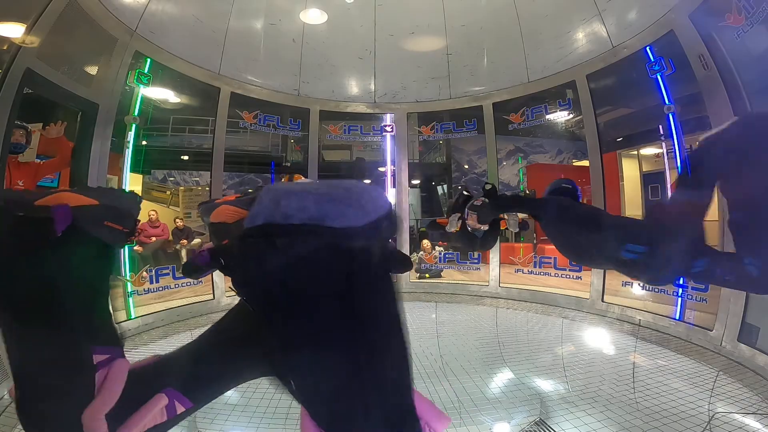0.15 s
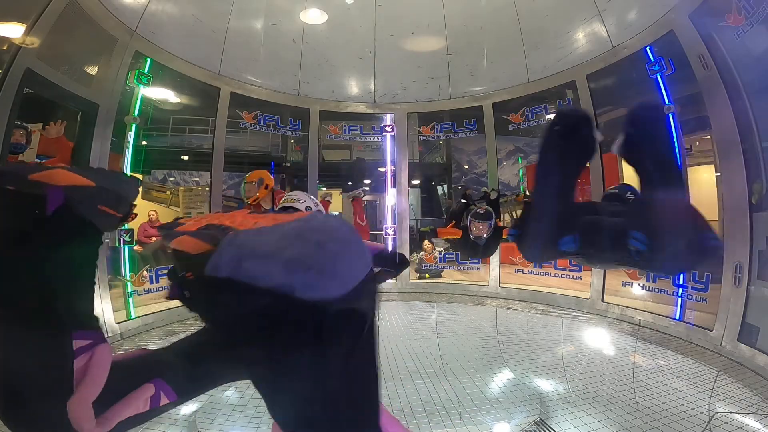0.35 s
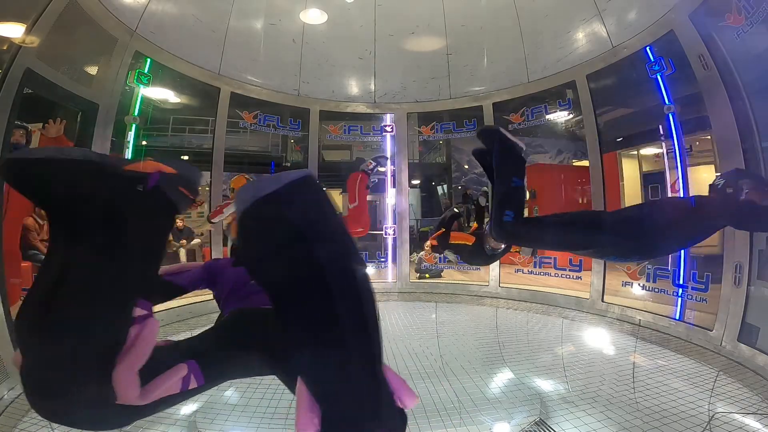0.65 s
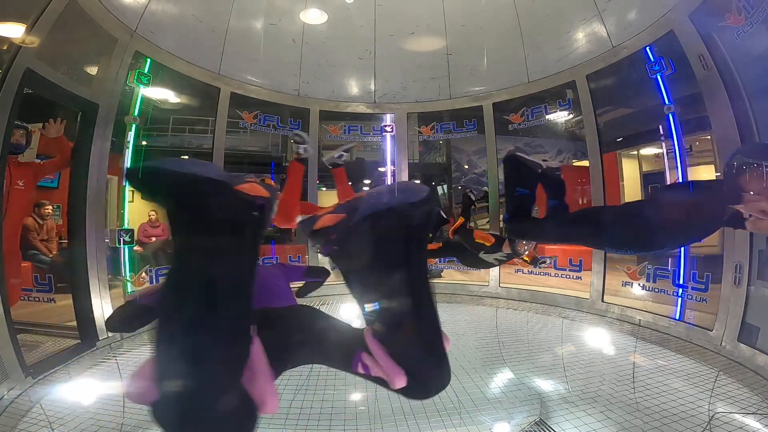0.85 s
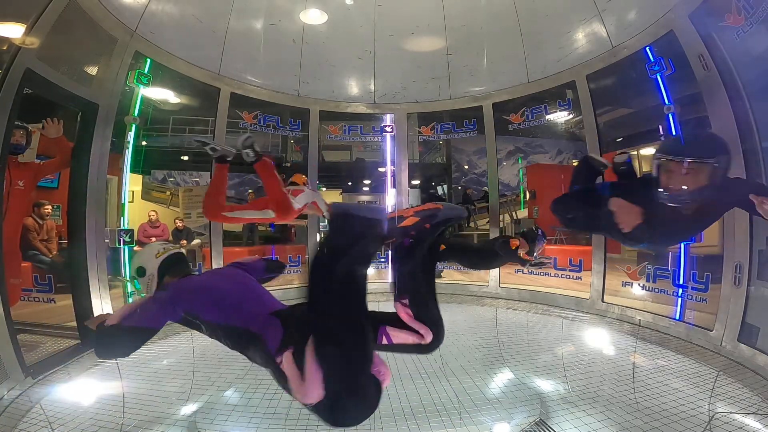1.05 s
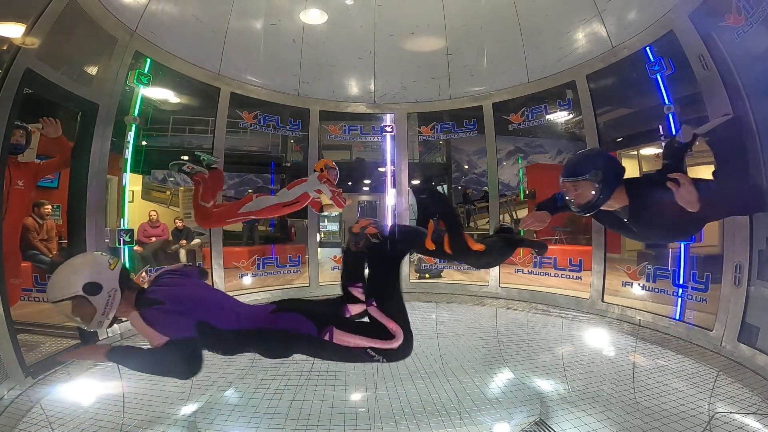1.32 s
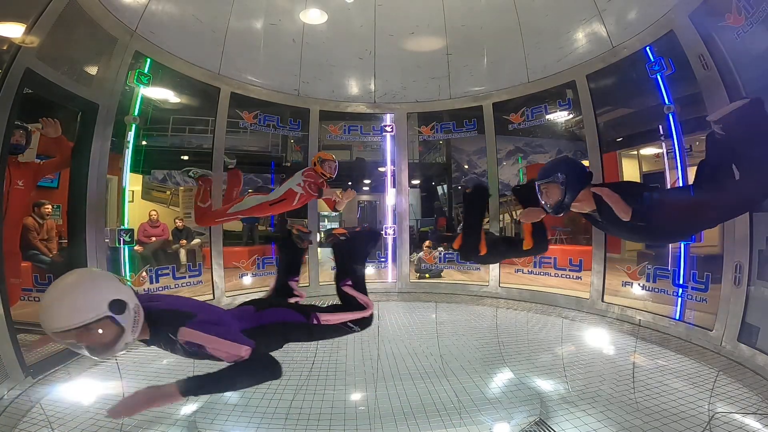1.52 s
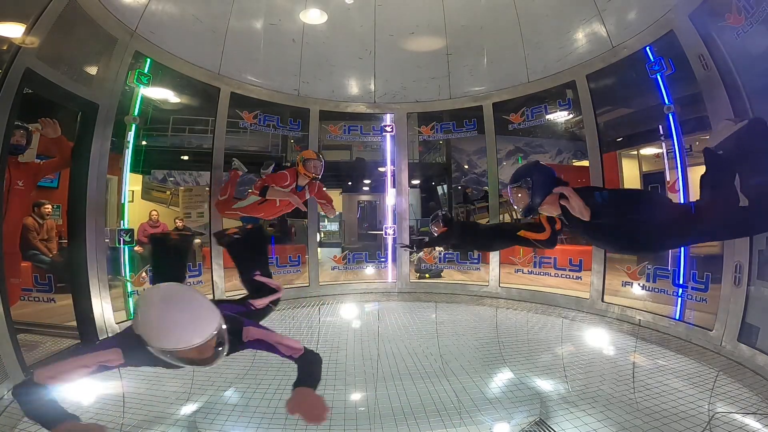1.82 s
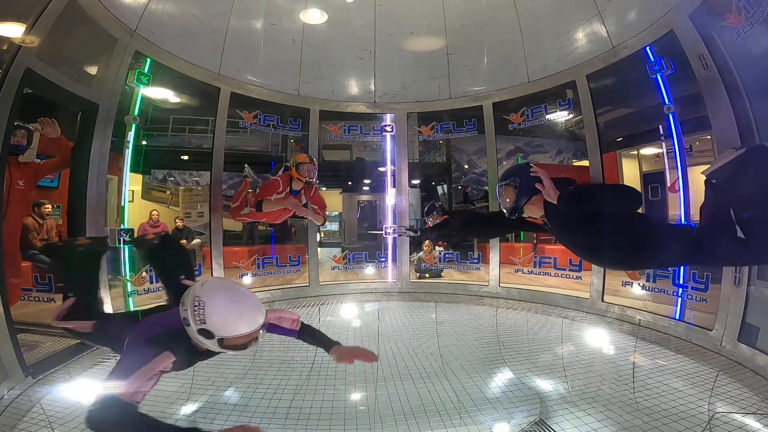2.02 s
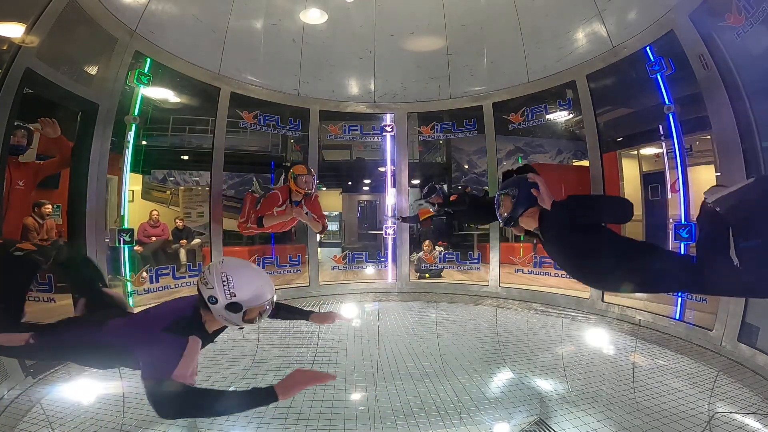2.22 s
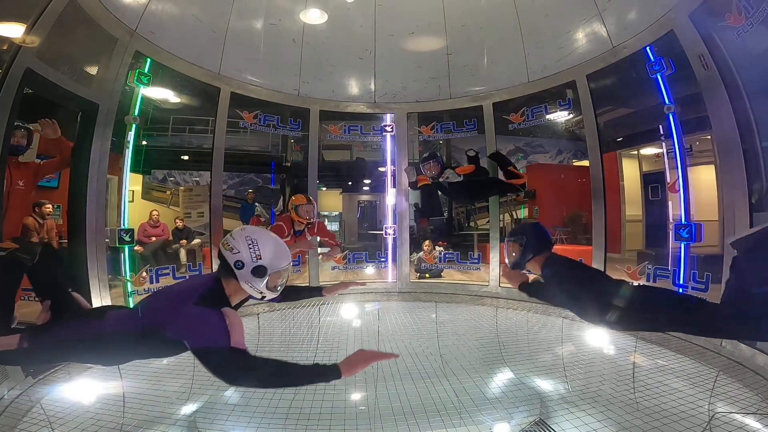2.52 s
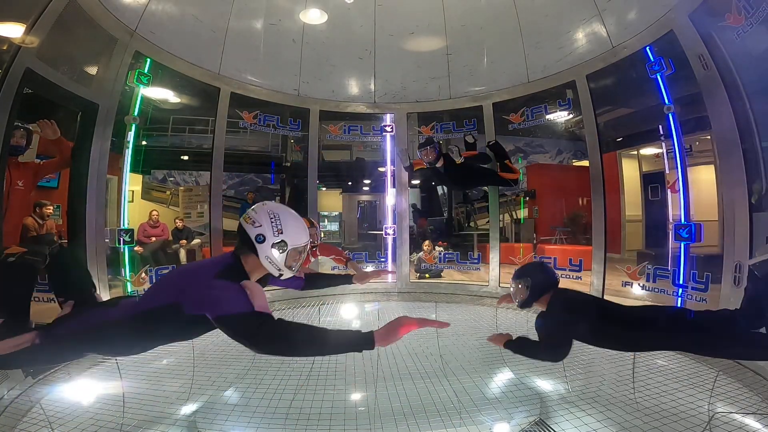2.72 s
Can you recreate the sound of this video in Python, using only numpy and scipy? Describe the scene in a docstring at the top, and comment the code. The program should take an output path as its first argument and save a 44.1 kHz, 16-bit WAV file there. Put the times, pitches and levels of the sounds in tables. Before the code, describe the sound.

A loud roar of rushing air fills a vertical wind tunnel for about three seconds, heard from the chamber wall. A deep throbbing drone and a high wavering whistle run through it. A second low note swells near 1.5 and 2.3 seconds. From 1.6 seconds a few brief low buffets of air hit the wall. After 2.4 seconds the rumble grows, with the strongest buffet near 2.8 seconds.

```python
"""Glass flight chamber of a vertical wind tunnel, heard from the wall.
From the start the air column throbs on one deep note, the duct's modes drone, and the flow roars
and sings near 3.5 kHz, probably on the cables of the floor net. A second low note swells near 1.5 s
and 2.3 s. From 1.6 s single eddies buffet the wall. After 2.4 s the turbulence grows as flyers drift
close; the throb dips briefly just before the end."""
import sys
import numpy as np
from scipy import signal
from scipy.fft import rfft, irfft, next_fast_len
from scipy.io import wavfile
from scipy.ndimage import uniform_filter1d, minimum_filter1d, map_coordinates

SR = 44100
rng = np.random.default_rng(int(sys.argv[2]) if len(sys.argv) > 2 else 0)


def wav_out(sig):
    """Save sig, one row per channel (or a flat mono array), as 16-bit PCM at SR to the path in sys.argv[1]."""
    wavfile.write(sys.argv[1], SR, np.round(np.clip(np.atleast_2d(sig).T, -1, 1) * 32767).astype(np.int16))


N = 126126

# two microphone ports
PORT_COHERENCE = [(100, 1), (400, .97), (1050, 0.95), (1330, 0.69), (1550, 0.68), (2200, 0.57), (2650, .72),
                  (3400, .33), (4000, 0.42), (5000, 0.26), (8000, .1)]  # (frequency [Hz], coherence [0..1])
PORT_BALANCE_DB = [(100, 1.4), (220, 0), (400, 3), (800, 4.2), (1050, 2.5), (1300, 3.5), (1600, 1.5),
                   (2000, 0), (2500, 5.5), (2900, 2), (3500, 1), (4200, -1.5), (5400, -7), (6500, -5),
                   (7800, -4.5), (10000, 0.5)]  # (frequency [Hz], left minus right [dB])
PORT_LEAD_RAD = [(100, 0), (2000, 0), (2300, -0.5), (3200, -.5), (3750, .2), (4300, 0.5), (5000, 2),
                 (6500, 2.5), (10000, 3.5)]  # (frequency [Hz], left phase lead [rad])
# duct resonances (centre [Hz], width [Hz], level [dB])
DUCT_MODES = [(86.8, 6, -28.5), (112.5, 5.1, -35.5), (126.5, 5, -33.5), (147.4, 8.7, -30.5),
              (161, 9.7, -29.5), (171.3, 10, -36), (191, 9.7, -34), (226.7, 11.2, -32.5),
              (253, 15.6, -32.3), (322, 16, -39.5), (457.2, 6.6, -44)]
# eddies hitting the wall (time [s], length [s], pitch [Hz], peak level [dB])
BUFFETS = [(1.622, .018, 150, -25), (2.322, .028, 140, -21), (2.65, 0.024, 158, -21),
           (2.737, .035, 242.3, -24.5), (2.778, 0.039, 152, -14.5)]
# vortex tones (centre [Hz], width [Hz], relative level [dB], left minus right [dB])
SINGING_BANDS = [(931, 42, -40.5, 7), (1118, 46, -35.5, 4), (3190, 276, -29.5, 8.5), (3450, 270, -26, 3.5),
                 (3668, 240, -27.5, 1.5)]
WHISTLE_BAND = (3550.5, 49.5, -33, 3.5)
# turbulence spectra (frequency [Hz], relative density [dB])
RUMBLE_SPECTRUM = [(5, -27.5), (20, 6), (30, 1.5), (50, -1.5), (100, -12), (140, -0.5), (175, -3.5),
                   (210, -9.5), (255, -5.5), (300, -13), (600, -49), (1500, -100)]
ROAR_SPECTRUM = [(100, -33), (220, -1.5), (310, 3.5), (500, 2.5), (800, 0), (1050, 2), (1400, -2.5),
                 (1900, -1.5), (2300, -2.5), (2950, -1.5), (3700, -2.5), (4200, -22.5), (6000, -62.5)]
HISS_SPECTRUM = [(2000, -46), (3400, -3), (3950, -1), (4400, -5.5), (5000, -9), (6000, -15), (7400, -17),
                 (8500, -26.5), (10000, -34), (13000, -43), (15000, -52.5)]
# flow envelopes (time [s], relative level [dB])
RUMBLE_DB = [(0, -21.5), (1.5, -23), (1.8, -24.5), (2.0, -22), (2.4, -21.5), (2.62, -17.5), (2.86, -17.5)]
ROAR_DB = [(0, -23), (1.0, -23), (2.2, -22.5), (2.42, -21.5), (2.54, -20), (2.6, -19.6), (2.68, -23),
           (2.86, -21.4)]
TREBLE_DB = [(0, 0.5), (.6, 0.5), (1.2, 0.55), (1.9, 0), (2.4, -0.6), (2.86, -.5)]  # singing and hiss
# air column envelopes
THROB_DB = [(0.02, -25.5), (0.07, -15), (0.46, -16.5), (0.52, -14), (0.7, -16), (2.23, -15.8), (2.62, -22),
            (2.77, -35), (2.83, -18.5)]  # (time [s], level [dB])
BOOM_DB = [(0, -30.5), (1.38, -34.5), (1.47, -23.5), (1.6, -23), (1.8, -23.5), (2.12, -39), (2.25, -24),
           (2.44, -21), (2.6, -32), (2.86, -28.5)]  # (time [s], relative level [dB])


def amp(db):
    """Decibels to gain."""
    return 10 ** (np.asarray(db) / 20)


def along(points, hz):
    """(Hz, value) points read on a log axis."""
    knots_hz, values = np.transpose(points)
    return np.interp(np.log(hz + 1), np.log(knots_hz + 1), values)


def curve(rows):
    """(s, value) rows read at every sample."""
    return np.interp(np.arange(N) / SR, *np.transpose(rows))


def wobble(rate_hz):
    """Smooth random curve, rate_hz knots a second."""
    return map_coordinates(rng.standard_normal(512), [np.arange(N) * rate_hz / SR], mode="mirror")


def band(centre_hz, width_hz):
    """Resonance with steep skirts."""
    return lambda hz: 1 / (1 + ((hz - centre_hz) / width_hz) ** 2) ** 2


def note(hz, drift_hz):
    """Sine of rms 1 with drifting pitch."""
    phase = 2 * np.pi * np.cumsum(hz + drift_hz * wobble(4.81)) / SR
    return np.sqrt(2) * np.sin(phase + rng.uniform(0, 2 * np.pi))


def airflow(colour, balance_db=PORT_BALANCE_DB):
    """Coloured noise at the two ports; their mean has rms 1."""
    hz = np.fft.rfftfreq(N, 1 / SR)
    common, opposed = rfft(rng.standard_normal((2, N))) * colour(hz)
    sign = np.array([[1], [-1]])
    mix_rad = np.arccos(np.clip(along(PORT_COHERENCE, hz), 0, 1)) / 2
    mixed = np.cos(mix_rad) * common + sign * np.sin(mix_rad) * opposed
    gain = amp(sign * along(balance_db, hz) / 2)
    lead = np.exp(1j * sign * along(PORT_LEAD_RAD, hz) / 2)
    pair = irfft(mixed * gain * lead, N)
    return pair / np.sqrt(np.mean(pair.mean(0) ** 2) + 1e-20)


def steadied(x, share):
    """x with a share of its swelling and fading evened out."""
    envelope = np.abs(signal.hilbert(x.mean(0)))
    even = x / (envelope + envelope.mean() / 10) ** share
    return even / even.mean(0).std()


def wavering(x, depth, rate_hz):
    """x with its pitch drifting by the fraction depth."""
    position = np.arange(N) + np.cumsum(depth * wobble(rate_hz))
    return np.array([map_coordinates(port, [position], mode="mirror") for port in x])


def duct():
    """The flow keeps the duct's modes droning at a fairly even strength."""
    return sum(amp(db) * steadied(airflow(band(hz, width_hz)), share=0.31)
               for hz, width_hz, db in DUCT_MODES)


def buffets(drift_hz=3.01):
    """Each eddy at the wall swells and fades on a wavering low note."""
    t = np.arange(N) / SR
    return sum(amp(db) * np.exp(-2 * ((t - peak_s) / length_s) ** 2) * note(hz, drift_hz)
               for peak_s, length_s, hz, db in BUFFETS)


def singing(waver_db=0.5):
    """Shed vortices sing in broad bands; a narrow whistle wanders inside the strongest."""
    bands = sum(amp(db + waver_db * wobble(12)) * airflow(band(hz, width_hz), [(hz, pan_db)])
                for hz, width_hz, db, pan_db in SINGING_BANDS)
    hz, width_hz, db, pan_db = WHISTLE_BAND
    narrow = airflow(band(hz, width_hz), [(hz, pan_db)])
    whistle = amp(db) * wavering(narrow, depth=0.017, rate_hz=11)
    return amp(curve(TREBLE_DB)) * (bands + whistle)


def eddies(spectrum, envelope_db, gain_db, flutter_db, flutter_hz):
    """Flow noise from one size range of eddies, fluttering in level."""
    level_db = curve(envelope_db) + gain_db + flutter_db * wobble(flutter_hz)
    return amp(level_db) * airflow(lambda hz: amp(along(spectrum, hz)))


def turbulence():
    """Big eddies rumble, smaller ones roar, the finest hiss."""
    rumble = eddies(RUMBLE_SPECTRUM, RUMBLE_DB, gain_db=-0.5, flutter_db=1.0, flutter_hz=20)
    roar = eddies(ROAR_SPECTRUM, ROAR_DB, gain_db=0.5, flutter_db=0.4, flutter_hz=20)
    hiss = eddies(HISS_SPECTRUM, TREBLE_DB, gain_db=-36.5, flutter_db=0.65, flutter_hz=18)
    return rumble + roar + hiss


def air_column(boom_gain_db=1.5):
    """The air column throbs and booms on two low notes, the same at both ports."""
    throb = amp(curve(THROB_DB)) * note(hz=38, drift_hz=0.13)
    boom = amp(curve(BOOM_DB) + boom_gain_db) * note(hz=65, drift_hz=1.6)
    return throb + boom


def scene():
    """All sounds of the moving air, in stereo."""
    return air_column() + buffets() + duct() + singing() + turbulence()


def record(dry):
    """Smooth peak limiter, then a brick-wall low-pass."""
    ceiling, hold_s, cutoff_hz = 0.86, 0.008, 15100
    span = int(hold_s * SR)
    needed_gain = ceiling / np.maximum(np.abs(dry).max(0), ceiling)
    gain = uniform_filter1d(minimum_filter1d(needed_gain, span), span)
    n_fft = next_fast_len(N + SR // 2)
    passband = np.fft.rfftfreq(n_fft, 1 / SR) < cutoff_hz
    return irfft(rfft(dry * gain, n_fft) * passband, n_fft)[..., :N]


dry = scene()
out = record(dry)
wav_out(out)
```